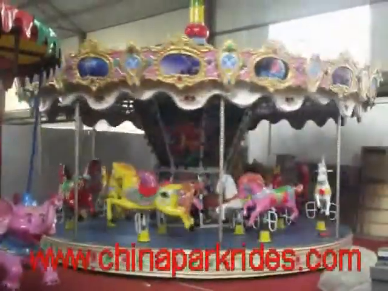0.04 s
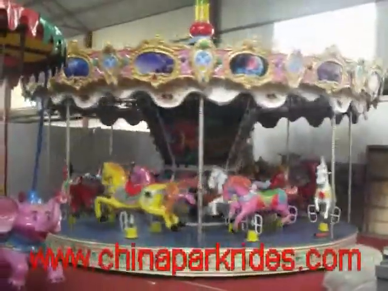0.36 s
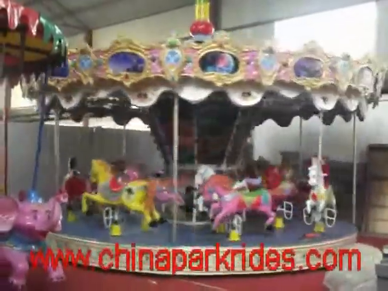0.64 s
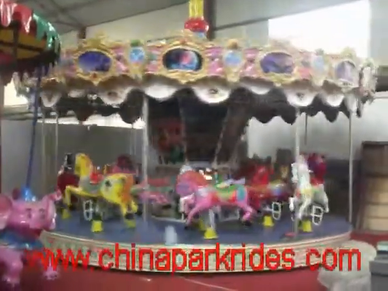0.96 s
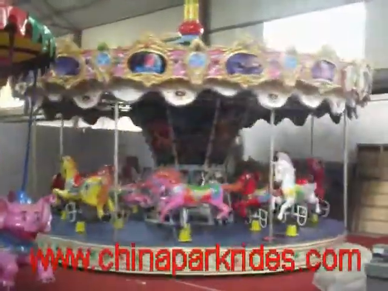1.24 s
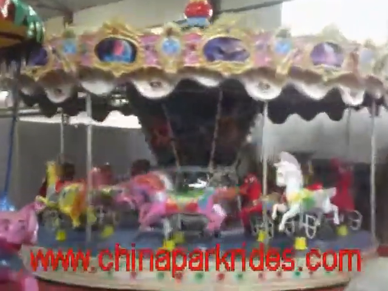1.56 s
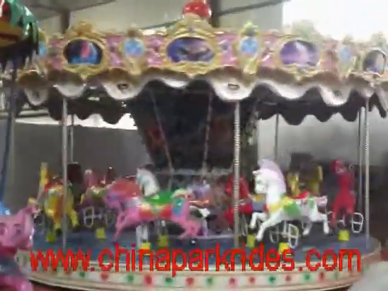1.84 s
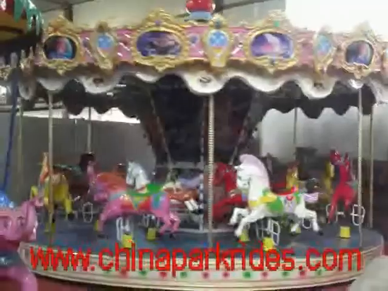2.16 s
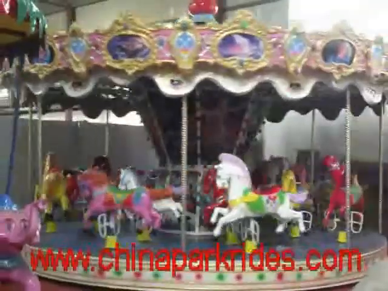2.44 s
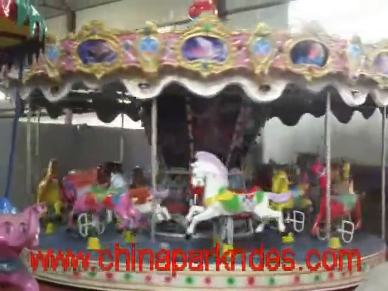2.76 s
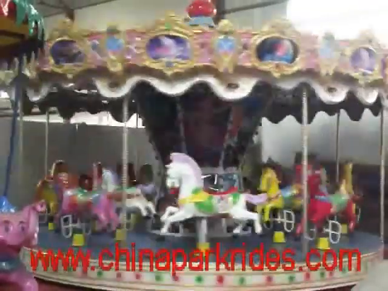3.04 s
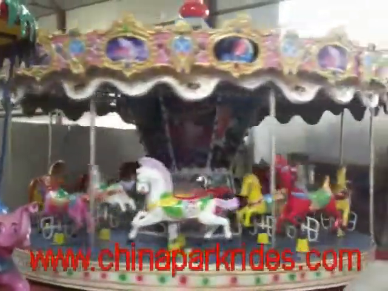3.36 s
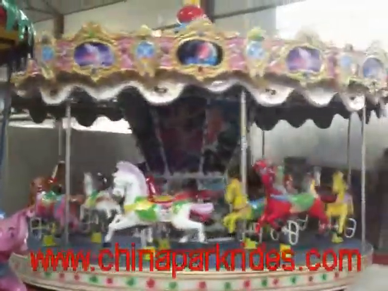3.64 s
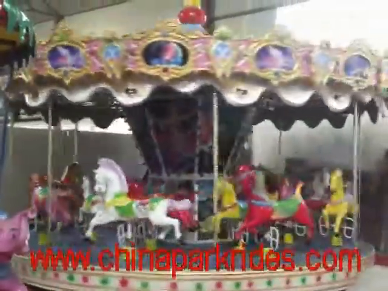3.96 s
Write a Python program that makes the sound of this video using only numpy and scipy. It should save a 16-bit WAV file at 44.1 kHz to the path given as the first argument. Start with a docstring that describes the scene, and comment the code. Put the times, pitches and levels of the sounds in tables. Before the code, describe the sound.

Low hum and rush of a turning carousel, rattling lightly, then a sharp metallic knock.

```python
"""A low motor hum swells and fades over rumble and rush: a carousel turning in a large workshop hall.
The motor hums at twice the rate of the mains power, the platform rumbles and bumps, and the drive rushes.
The running gear rattles, clicks and squeaks, and near the end one hard metal knock rings through the hall.
A small microphone picks it all up, with a narrow range of tones and a peak near 2600 Hz."""
import sys
import numpy as np
from scipy import signal
from scipy.io import wavfile

SR = 44100
rng = np.random.default_rng(int(sys.argv[2]) if len(sys.argv) > 2 else 0)


def dump(signal):
    """Clip the signal to [-1, 1] and save it as 16-bit WAV at the path in sys.argv[1]."""
    limited = np.clip(np.atleast_2d(signal).T, -1, 1)
    pcm = np.round(limited * 32767).astype(np.int16)
    wavfile.write(sys.argv[1], SR, pcm)


N = 176400

# The tones and range of the rattle and clicks, as heard through the microphone's peak near 2600 Hz.
# Each row: pitch in Hz, relative level in dB, seconds to fade by 60 dB.
CONTACT_TONES = [(1870, -7.5, 0.021), (2465, 2, 0.013), (2623, 2.5, 0.013), (2873, -0.5, 0.0091),
                 (3100, -10.5, 0.01), (3580, -13, 0.0069), (3600, -21, .01), (5300, -20, 0.012)]
CONTACT_BAND_HZ = [1680, 4000]
SMALL_SOUND_ECHO_DB = -6   # hall echo of clicks, squeaks and bumps


def motor_hum(pitch_hz=100.1, overtone_follow=.45):
    """Mains power makes the motor hum almost purely; weak, wavering overtones partly follow its swell."""
    # The hum's rise and fall. Each row: time in seconds, level in dB.
    hum_levels = [(0, -14.5), (.1, -14), (.18, -7.5), (.3, -12), (.48, -13), (.62, -17), (.75, -19.5),
                  (.95, -20), (1.05, -13), (1.17, -16.5), (1.25, -13), (1.45, -14), (1.7, -10.5),
                  (1.95, -8.5), (2.3, -8.5), (2.75, -5.5), (3.13, -5), (3.35, -7.5), (3.56, -12.5),
                  (3.71, -19), (3.8, -14), (3.89, -13), (3.95, -22.5), (4, -20)]
    # Higher tones in the hum. Each row: multiple of the pitch, level in dB before the swell is added.
    overtones = [(2, -28), (3, -46)]
    phase = 2 * np.pi * pitch_hz * np.arange(N) / SR + rng.uniform(0, 2 * np.pi)
    level_db = curve(hum_levels)
    hum = from_db(level_db + .5 * drift(rate_hz=9)) * np.sin(phase)
    for multiple, db in overtones:
        overtone_db = db + overtone_follow * level_db + 2 * drift(rate_hz=3.8)
        hum += from_db(overtone_db) * np.sin(round(multiple) * phase)
    return np.sqrt(2) * hum


def frame_knock():
    """A blow bounces and chatters on the steel frame, heard as a rough crack and ringing tones."""
    # The blow and its bounces. Each row: start in seconds, strength in dB.
    bounces = [(3.6036, 2), (3.6075, -6), (3.6155, 1), (3.6205, -8)]
    # The knock's ringing tones, as heard through the microphone's peak near 2600 Hz.
    # Each row: pitch in Hz, relative level in dB, seconds to fade by 60 dB.
    knock_tones = [(1090, -21.5, 0.11), (1480, -27, 0.035), (1635, -20, .03), (1936, -17, 0.033),
                   (2160, -17.5, 0.038), (2230, -12, 0.027), (2576, -5.5, 0.022), (2750, -14, 0.023),
                   (3083, -8, 0.016), (3800, -23.5, 0.015), (4820, -30, .04), (5280, -33.5, .02),
                   (6130, -44.5, .03)]
    hits, ringing = blows(bounces), 0
    for hz, db, fade_s in knock_tones:
        chatter = dying_noise(fade_s=.098)
        force = signal.fftconvolve(hits, chatter / np.linalg.norm(chatter))[:N]
        half_octave = [hz / 2 ** .25, hz * 2 ** .25]
        ringing += from_db(db) * butter(ring(force, hz, fade_s), half_octave, "band")
    bursts = signal.fftconvolve(hits, dying_noise(fade_s=.082))[:N]
    crack = butter(bursts, [950, 3240], "band", order=5)
    return hall(ringing + from_db(-6.5) * crack, echo_db=-.5)


def gear_rattle(contacts_per_s=1100, spread_db=1.5):
    """Many tiny contacts in the gear blur into a rattle, each starting every tone at a random strength."""
    # How hard the gear rattles. Each row: time in seconds, level in dB.
    rattle_levels = [(0, -28), (.08, -27.5), (.3, -38.5), (.41, -27.5), (.55, -34.5), (1.05, -31.5),
                     (1.27, -28), (1.35, -23), (1.38, -20), (1.59, -20), (1.615, -27), (1.77, -28),
                     (1.83, -24.5), (2.1, -37), (3.55, -36.5), (4, -32)]
    touches = rng.random(N) < contacts_per_s / SR
    contacts = touches * from_db(spread_db * np.minimum(rng.exponential(1, N), 3))
    ringing = sum(from_db(db) * ring(contacts * rng.standard_normal(N), hz, fade_s)
                  for hz, db, fade_s in CONTACT_TONES)
    rattle = hall(butter(ringing, CONTACT_BAND_HZ, "band"), echo_db=1.5)
    return from_db(curve(rattle_levels)) * unit_power(rattle)


def gear_clicks(ping_width_hz=480, ring_db=-19):
    """Hard single contacts in the gear each give a short ping and a little ringing."""
    # The sharp clicks. Each row: start in seconds, the ping's peak level in dB, its pitch in Hz.
    clicks = [(1.2940, -9, 2560), (1.2978, -4.5, 2400), (1.3037, -4.5, 2580), (1.3060, -0.5, 2560),
              (3.4137, -9.5, 2800), (3.9231, -15.5, 2870), (3.9883, -9.5, 2720)]
    hits = blows([(start, db) for start, db, _ in clicks])
    ringing = sum(from_db(ring_db + db) * ring(hits, hz, fade_s) for hz, db, fade_s in CONTACT_TONES)
    sound = butter(ringing, CONTACT_BAND_HZ, "band")
    for start, db, hz in clicks:
        band_hz = [hz - ping_width_hz / 2, hz + ping_width_hz / 2]
        ping = butter(blows([(start, 0)]) + 1e-18, band_hz, "band")
        sound += from_db(db) * ping / np.abs(ping).max()
    return hall(sound, SMALL_SOUND_ECHO_DB)


def bearing_squeaks():
    """Rubbing in the bearings stirs brief squeaks."""
    # Each row: start in seconds, length in seconds, pitch in Hz, band width in Hz, level in dB.
    squeaks = [(.04, .12, 2630, 203, -31.5), (0.388, 0.066, 2620, 248, -28),
               (1.793, 0.043, 5450, 600, -46.5), (1.812, 0.053, 2630, 150, -23.5),
               (2.802, .09, 833, 72.3, -31.5), (3.048, 0.08, 2420, 148, -32.5)]
    return noise_swells(squeaks)


def platform_bumps():
    """Jolts stir low, dull bumps in the platform."""
    # Each row: start in seconds, length in seconds, pitch in Hz, band width in Hz, level in dB.
    bumps = [(.63, .09, 123.8, 46, -14.5), (2.18, 0.13, 35.7, 19, -24), (3.18, .18, 32.4, 9.6, -23.5)]
    return noise_swells(bumps)


def platform_rumble(level_db=-20.5):
    """The turning platform makes a deep, flickering noise."""
    # The rumble's tone colour. Each row: frequency in Hz, relative level in dB.
    rumble_spectrum = [(18, -17.5), (33, -0.5), (50, -5.5), (80, -3), (120, 4), (145, -1), (175, -8),
                       (240, -9.5), (330, -28.5)]
    return from_db(level_db) * banded_noise(rumble_spectrum, flicker_db=1.5)


def drive_rush():
    """The running drive makes a broad noise that gently rises and falls."""
    # The rush's tone colour at the microphone. Each row: frequency in Hz, relative level in dB.
    rush_spectrum = [(150, -1), (300, 4), (500, 0.5), (800, -2), (1300, -7.5), (1900, -7), (2550, -3.5),
                     (3100, -10.5), (3800, -24), (5200, -28.5), (6000, -41), (7000, -54)]
    # The rush's rise and fall. Each row: time in seconds, level in dB.
    rush_levels = [(0, -24), (1.0, -25.5), (1.7, -23.5), (2.3, -26.5), (3.2, -27.5), (4, -24.5)]
    return from_db(curve(rush_levels)) * banded_noise(rush_spectrum, flicker_db=1.07)


def hall(sound, echo_db, delay_s=.0071, dull_above_hz=4160):
    """The direct sound plus the hall's dull, smeared echo."""
    tail = dying_noise(fade_s=1.0) * (np.arange(SR) > delay_s * SR)
    tail = butter(tail, dull_above_hz, "low")
    tail *= np.sqrt(2 * dull_above_hz / SR / np.sum(tail ** 2))
    return sound + from_db(echo_db) * signal.fftconvolve(sound, tail)[:N]


def noise_swells(rows):
    """For each row, a narrow band of noise swells and fades in the hall."""
    t, sound = np.arange(N) / SR, 0
    for start, length, hz, width, db in rows:
        swell = np.sqrt(np.sin(np.pi * np.clip((t - start) / length, 0, 1)))
        noise = butter(rng.standard_normal(N), [hz - width / 2, hz + width / 2], "band")
        sound += from_db(db) * swell * unit_power(noise)
    return hall(sound, SMALL_SOUND_ECHO_DB)


def banded_noise(spectrum, flicker_db):
    """Narrow bands of noise follow a spectrum, each flickering by itself; the total power is 1."""
    hz, db = np.transpose(spectrum)
    edges_hz = 16 * 2 ** np.arange(0, 9.1, .25)   # four bands to the octave
    white, noise = rng.standard_normal((2, N + SR // 2)), 0
    for k, (low, high) in enumerate(zip(edges_hz, edges_hz[1:])):
        band_db = np.interp(np.log(low * high) / 2, np.log(hz), db, left=-np.inf, right=-np.inf)
        flicker = drift(rate_hz=10)
        if np.isfinite(band_db):
            band = butter(white[k % 2], [low, high], "band", order=3)[-N:]
            noise += from_db(band_db + flicker_db * flicker) * band
    return unit_power(noise)


def ring(force, hz, fade_s):
    """Each push starts a pure tone that fades by 60 dB in fade_s seconds."""
    decay, angle = 1000 ** (-1 / (fade_s * SR)), 2 * np.pi * hz / SR
    return signal.lfilter([0, np.sin(angle)], [1, -2 * decay * np.cos(angle), decay ** 2], force + 1e-18)


def blows(rows):
    """One sharp push for each row of seconds and dB."""
    starts, db = np.transpose(rows)
    return np.bincount((starts * SR).astype(int), from_db(db), N + SR)[:N]


def dying_noise(fade_s):
    """One second of noise that fades by 60 dB in fade_s seconds."""
    return rng.standard_normal(SR) * 1000 ** (-np.arange(SR) / SR / fade_s)


def drift(rate_hz, step=40):
    """A slow random wander, typically about 1 in size."""
    memory = np.exp(-2 * np.pi * rate_hz * step / SR)
    noise = rng.standard_normal(N // step + 2002)
    slow = signal.lfilter([1], [1, -2 * memory, memory ** 2], noise)[2000:]
    return np.interp(np.arange(N) / step, np.arange(len(slow)), unit_power(slow))


def curve(rows):
    """Join rows of time and value with straight lines."""
    return np.interp(np.arange(N) / SR, *np.transpose(rows))


def butter(sound, hz, kind, order=2):
    """A filter that keeps the lows or one band; a higher order cuts more sharply."""
    return signal.sosfilt(signal.butter(order, hz, kind, fs=SR, output="sos"), sound)


def from_db(db):
    """Turn decibels into a multiplier."""
    return 10 ** (np.asarray(db) / 20)


def unit_power(sound):
    """Scale to an average power of 1."""
    return sound / np.sqrt(np.mean(sound ** 2) + 1e-20)


def scene():
    """All the sources add up in one channel."""
    running = motor_hum() + platform_rumble() + drive_rush() + gear_rattle()
    return (running + gear_clicks() + bearing_squeaks() + platform_bumps() + frame_knock())[None]


def record(dry, top_hz=6300):
    """The small microphone loses the high treble and clips any peak that is too loud."""
    narrow = signal.sosfilt(signal.cheby1(10, .3, top_hz, fs=SR, output="sos"), dry)
    return butter(np.clip(narrow, -1, 1), 15800, "low", order=12)


dry = scene()
out = record(dry)
dump(out)
```